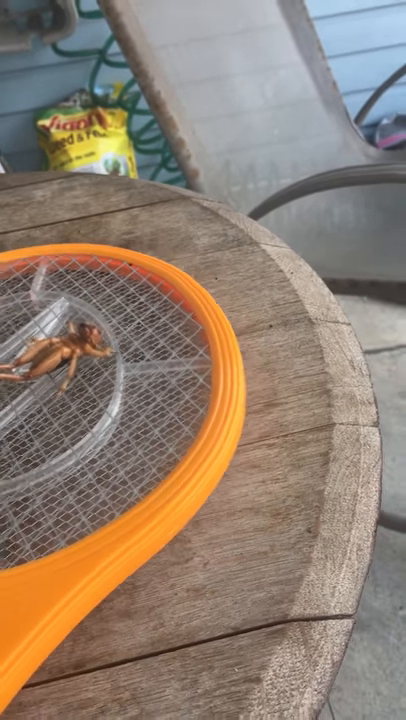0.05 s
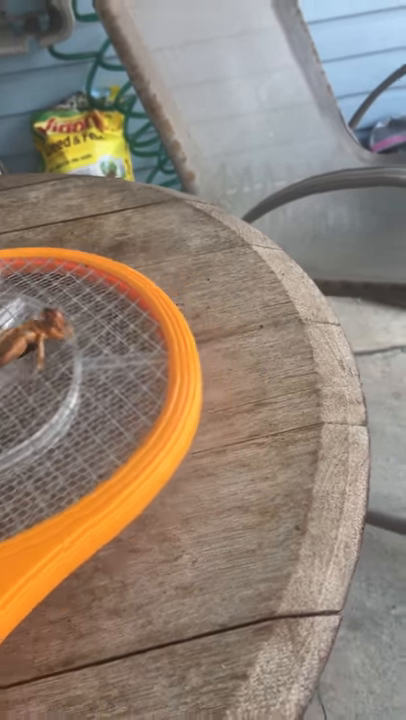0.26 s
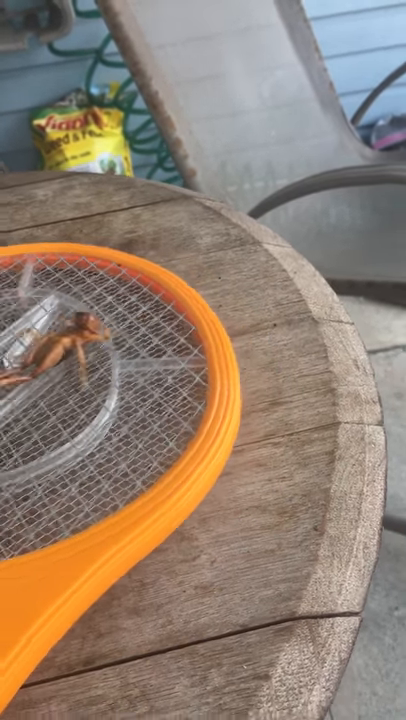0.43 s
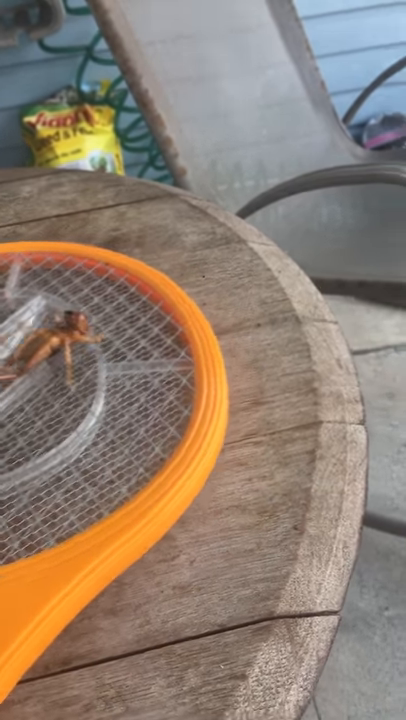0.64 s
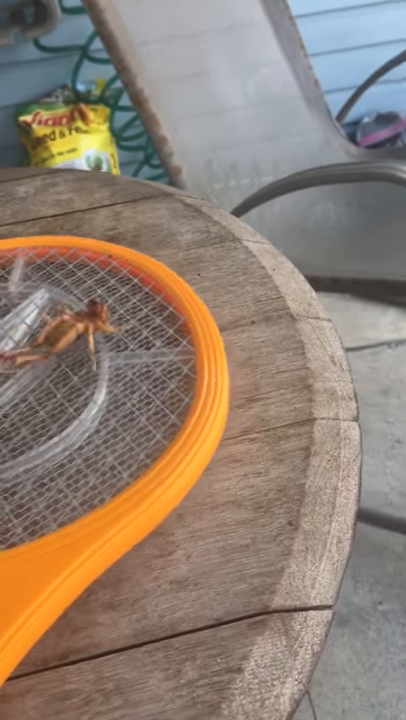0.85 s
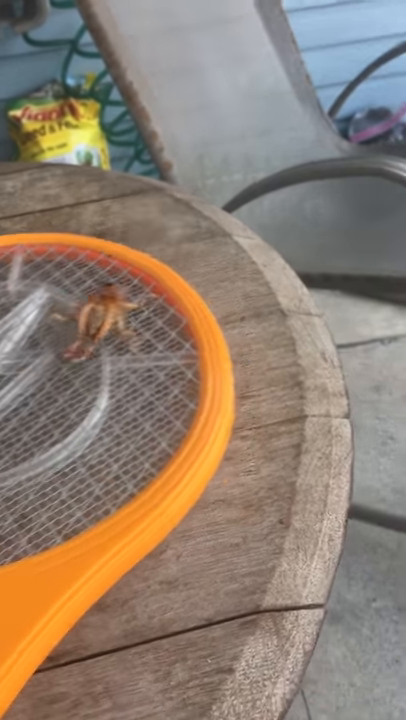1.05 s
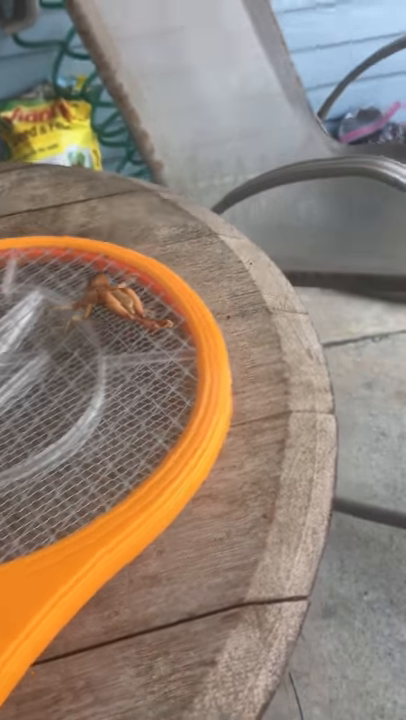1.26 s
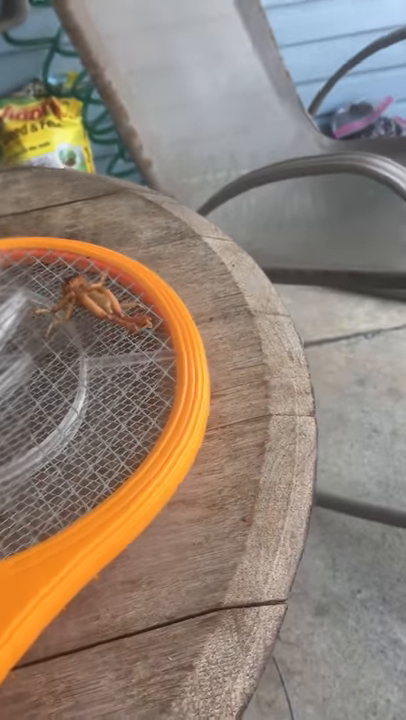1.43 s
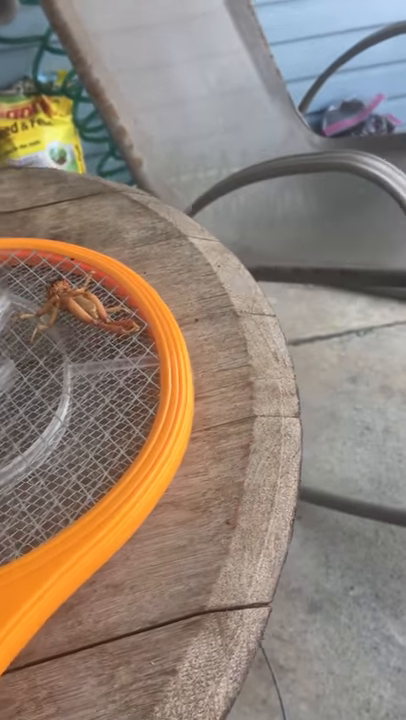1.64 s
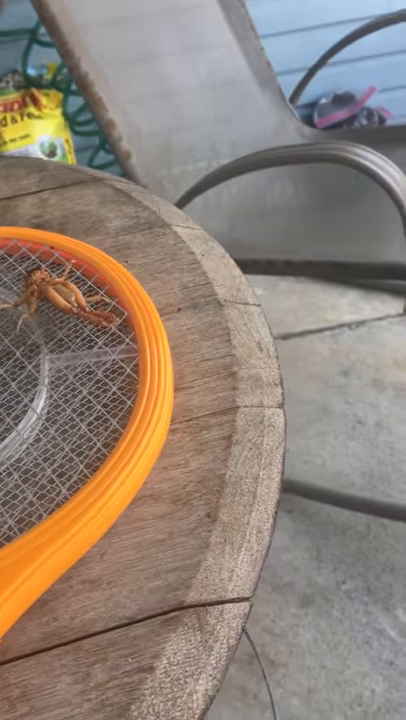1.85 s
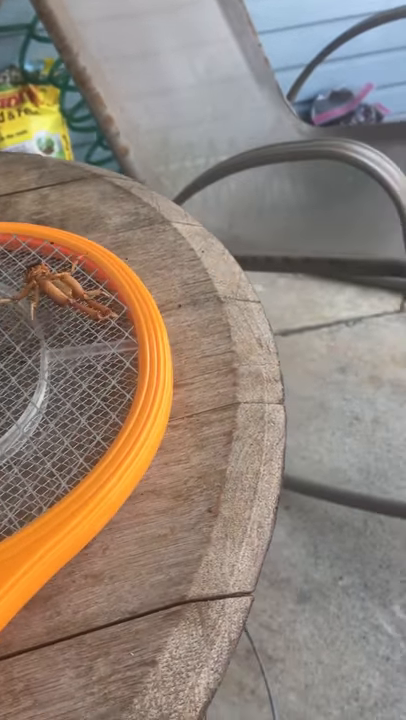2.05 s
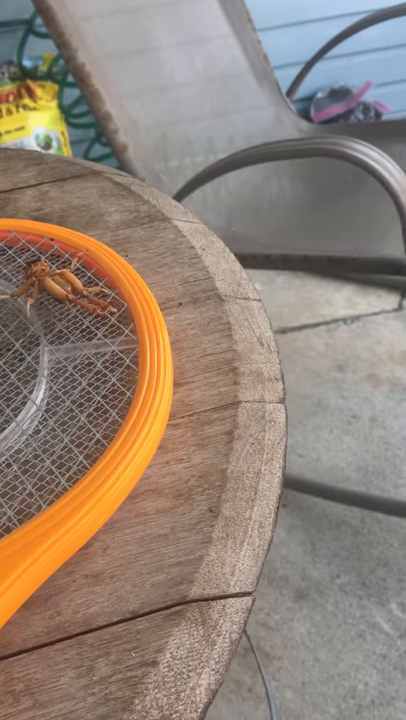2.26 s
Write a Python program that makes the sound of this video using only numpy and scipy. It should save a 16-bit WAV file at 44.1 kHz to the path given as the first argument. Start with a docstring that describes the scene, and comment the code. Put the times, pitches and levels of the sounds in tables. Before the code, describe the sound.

Two sharp electric swatter sparks amid mesh rattles and soft handling thumps, then faint crackling.

```python
"""Garden table, close up: a handheld electric swatter is jiggled with a large insect on its wire mesh.
The insect bounces and slides; the mesh rattles and rings, the plastic frame knocks.
Twice it bridges the wires: a spark snaps and echoes off table and wall.
The moving hand adds low thumps and rumble. As the racket settles, a faint electric crackle remains,
with tiny wire pings and a thin whine, over quiet outdoor air and hiss."""
import sys
import numpy as np
from scipy import signal
from scipy.fft import rfft, irfft
from scipy.io import wavfile

SR = 44100
rng = np.random.default_rng(int(sys.argv[2]) if len(sys.argv) > 2 else 0)


def unload_audio(sound):
    """Save the sound as a 16-bit wav file, at the path given as the first command line argument."""
    columns = np.transpose(np.atleast_2d(sound))
    # keep every value between -1 and 1, then stretch to whole-number steps
    steps = np.round(np.clip(columns, -1, 1) * 32767)
    wavfile.write(sys.argv[1], SR, steps.astype(np.int16))


N = 105840
T = np.arange(N) / SR

# insect landings: start_s, level_db, rattle_t60_s, treble_db
INSECT_LANDINGS = [(0.179, -43, 0.13, 2), (0.3517, -17.5, .2, 2.5), (0.407, -27.5, 0.25, 1),
                   (0.531, -26, 0.25, -1), (0.636, -21, 0.21, -3), (0.939, -29.5, 0.3, -0.5),
                   (1.035, -38.5, .2, -2.5), (1.1872, -21.5, 0.19, 2), (1.3037, -26.5, 0.22, -6.5),
                   (1.4621, -33, 0.02, -1.5)]
# insect sliding on the wires: time_s, level_db
SLIDE_CURVE = [(0.0, -68), (0.13, -52.5), (0.16, -59), (0.21, -43), (0.25, -36.5), (0.29, -55.5),
               (0.6, -60), (0.74, -39), (0.84, -57), (0.885, -50), (0.93, -55.5), (1.12, -43), (1.17, -59),
               (1.4, -46), (1.56, -69), (1.8, -71)]
# mesh rattle: freq_hz, gain_db
MESH_SPECTRUM = [(250, -18.5), (380, -5.5), (510, -8.5), (800, -15), (1100, -7.5), (1400, 5), (1750, -8),
                 (2150, -5.5), (2800, -21), (4400, -13), (5600, -22.5), (6700, -19.5), (7600, -27),
                 (9000, -19), (10600, -30), (15500, -35)]
# wire resonances: pitch_hz, gain_db, t60_s
WIRE_MODES = [(1168, -4, .14), (1310, -3, .16), (1374, 2, .22), (1455, -3, .22), (1484, -5, .18),
              (1653, -3, .11), (1918, -14, .14), (2092, -11, .17), (2206, -10, .17)]
# hollow frame resonances: pitch_hz, gain_db, t60_s
HOLLOW_FRAME_MODES = [(363.2, -10.5, 0.2), (428.8, -9.5, 0.21), (619, -18.5, 0.16)]
# frame and handle knocks: start_s, level_db, pitch_hz, t60_s
PLASTIC_KNOCKS = [(0.3536, 0.5, 1500, 0.003), (0.4421, -6, 810, 0.0031), (1.187, -8, 1100, 0.0083),
                  (1.463, -25.5, 1190, 0.0075), (1.6222, -22.5, 431, 0.026), (1.75, -30, 540, 0.041)]

# sparks: start_s, crack_db, arc_t60_s, early_db, echo_db
SPARK_SNAPS = [(0.6667, 16, .0018, -1.5, -13), (1.3251, 15, .0045, 0.5, -12.5)]
# direct crack: freq_hz, gain_db
CRACK_SPECTRUM = [(300, -12), (1500, -2), (6500, -6), (9700, 5), (12000, 1), (15500, 1)]
# spark echoes, duller: freq_hz, gain_db
ECHO_SPECTRUM = [(200, -19.5), (700, -3), (1400, 6), (2100, 3), (3000, -4.5), (4500, 1), (5500, -1),
                 (7600, -1.5), (9000, 2), (10600, -5.5), (15500, -10.5)]
# reflections off racket, table and floor: delay_s, gain_db, t60_s
EARLY_REFLECTIONS = [(0.0005, -11, 0.006), (0.003, -8, .008), (0.0098, -14.5, .016)]

# hand thumps: start_s, level_db, start_pitch_hz
HAND_THUMPS = [(0.212, -18, 344), (0.263, -15, 316), (0.327, -19, 375), (0.395, -17, 285),
               (0.555, -17, 302), (0.586, -20, 110), (0.664, -14, 367), (0.719, -28, 220),
               (0.885, -15, 140), (0.974, -21.5, 265), (0.776, -26, 224), (0.817, -33.5, 294),
               (1.003, -14, 130), (1.025, -18, 260), (1.102, -16, 110), (1.135, -19.5, 215),
               (1.198, -18, 196), (1.247, -13.5, 280), (1.306, -14, 299), (1.371, -15.5, 312),
               (1.444, -17.5, 250), (1.502, -37.5, 445), (1.596, -29.5, 420), (1.623, -22.5, 428),
               (1.696, -30, 330), (1.756, -17, 259), (1.827, -28.5, 524), (1.852, -22, 280),
               (2.112, -24.5, 126)]
# hand rumble: time_s, level_db
RUMBLE_CURVE = [(0, -35.5), (0.3, -28.5), (0.8, -34), (1.03, -25.5), (1.3, -28.5), (1.54, -31.5),
                (1.7, -31), (1.95, -39), (2.13, -36), (2.4, -41.5)]
# hand rumble: freq_hz, gain_db
RUMBLE_SPECTRUM = [(15, -43), (30, -3.5), (43, 6.5), (62, 4.5), (105, 0), (160, -19), (300, -26),
                   (1500, -78.5)]

# faint discharges: start_s, level_db, racket_ring_db
DISCHARGE_TICKS = [(1.752, -40.5, 10.5), (1.826, -31.5, 5.5), (1.897, -33, 0), (1.952, -36, 0),
                   (2.026, -38.5, -10), (2.073, -39, -1), (2.1575, -37.5, -16), (2.208, -35, 6),
                   (2.236, -33.5, 2.5), (2.279, -33, 3.5), (2.319, -35.5, 4.5), (2.394, -38, -5)]
# crackle: freq_hz, gain_db
CRACKLE_SPECTRUM = [(400, 2), (2100, 5.5), (3000, -6.5), (4300, 3), (5400, -1), (6500, -3.5), (9600, -1.5),
                    (10400, -9), (15500, -7)]
# single-wire pings: start_s, level_db
WIRE_PINGS = [(1.799, -41), (1.902, -40), (1.930, -45), (2.106, -39)]

# outdoor air: freq_hz, gain_db
AIR_SPECTRUM = [(380, 2), (500, -8.5), (680, 2.5), (900, -11), (1300, -5), (1700, -12.5), (2050, -9.5),
                (3000, -42)]
# hiss: time_s, level_db
HISS_CURVE = [(0, -64.5), (1.48, -63.5), (1.745, -64), (1.775, -71.5), (2.4, -72)]
# hiss: freq_hz, gain_db
HISS_SPECTRUM = [(500, -57), (2000, -9), (5000, -7), (9700, -12), (10500, -15)]


def from_db(db):
    """Decibels to gain."""
    return 10 ** (np.asarray(db) / 20)


def level(curve):
    """Gain along (time_s, level_db) points."""
    return from_db(np.interp(T, *np.transpose(curve)))


def decay(start_s, t60_s):
    """Step to 1, then exponential decay."""
    return (T >= start_s) * from_db(-60 * np.clip((T - start_s) / t60_s, 0, 10))


def coloured(x, spectrum):
    """Minimum-phase filter through (freq_hz, gain_db) points; unit power gain."""
    size = 8192
    hz, db = np.transpose(spectrum)
    bins_hz = np.fft.rfftfreq(size, 1 / SR)
    gain = from_db(np.interp(np.log(bins_hz + 1), np.log(hz), db))
    cepstrum = irfft(np.log(gain))
    cepstrum[1:size // 2] *= 2
    cepstrum[size // 2 + 1:] = 0
    response = irfft(np.exp(rfft(cepstrum)))
    return signal.fftconvolve(x, response / np.linalg.norm(response))[:len(x)]


def noise(spectrum):
    """Steady coloured noise, rms about 1."""
    return coloured(rng.standard_normal(N + SR), spectrum)[SR:]


def split(x, hz):
    """Low and high bands."""
    low = signal.sosfiltfilt(signal.butter(2, hz, fs=SR, output="sos"), x)
    return low, x - low


def ring(x, hz, t60_s):
    """Two-pole resonator; unit power gain."""
    radius, angle = from_db(-60 / (t60_s * SR)), 2 * np.pi * hz / SR
    gain = np.sin(angle) * np.sqrt(2 * (1 - radius ** 2))
    return signal.lfilter([0, gain], [1, -2 * radius * np.cos(angle), radius ** 2], x + 1e-18)


def clicks(rows):
    """One impulse per (start_s, level_db)."""
    out = np.zeros(N)
    for start_s, db in rows:
        out[min(int(start_s * SR), N - 1)] += from_db(db)
    return out


def grains(rate_per_s, spread_db):
    """Random impulses of uneven size and sign."""
    hits = rng.random(N) < rate_per_s / SR
    return hits * from_db(spread_db * rng.standard_normal(N)) * rng.choice([-1, 1], N)


def discharges(rows, sizzle_db=-20, t60_s=0.026):
    """Click plus brief sizzle per (start_s, level_db)."""
    sizzle = sum(from_db(db + sizzle_db) * decay(start_s, t60_s) for start_s, db in rows)
    return clicks(rows) + sizzle * rng.standard_normal(N)


def mesh_rattle(rattle_db=-1, ring_db=-19.5, touch_db=-8.5, touch_t60_s=0.011):
    """Tiny insect contacts drive the mesh: sliding, plus a brief touch and dying run per landing."""
    contacts = grains(rate_per_s=5000, spread_db=2.5)
    low, high = split(contacts / contacts.std(), hz=2780)
    low_power = high_power = level(SLIDE_CURVE) ** 2
    for start_s, db, t60_s, treble_db in INSECT_LANDINGS:
        touch = from_db(touch_db) * decay(start_s, touch_t60_s)
        landing = from_db(db) * (decay(start_s, t60_s) + touch)
        low_power = low_power + landing ** 2
        high_power = high_power + (from_db(treble_db) * landing) ** 2
    drive = low * np.sqrt(low_power) + high * np.sqrt(high_power)
    ringing = sum(from_db(db) * ring(drive, hz, t60_s) for hz, db, t60_s in WIRE_MODES)
    return from_db(rattle_db) * coloured(drive, MESH_SPECTRUM) + from_db(ring_db) * ringing


def landing_rings(wire_db=-7.5, spread_db=1, rise_s=0.004, max_t60_ratio=1.5):
    """Each landing strikes wire and frame modes; a short, dead landing damps them."""
    out = 0
    for start_s, db, rattle_t60_s, _ in INSECT_LANDINGS:
        age_s = np.maximum(T - start_s, 0)
        rise = 1 - np.exp(-age_s / rise_s)
        for modes, body_db in ((WIRE_MODES, wire_db), (HOLLOW_FRAME_MODES, 0)):
            for hz, mode_db, t60_s in modes:
                gain = from_db(db + body_db + mode_db + spread_db * rng.standard_normal())
                fade = decay(start_s, min(t60_s, max_t60_ratio * rattle_t60_s))
                out += gain * rise * fade * np.sin(2 * np.pi * (hz * age_s + rng.random()))
    return out


def frame_knocks(rise_cycles=0.73):
    """Plastic frame and handle: one heavily damped mode per knock."""
    out = 0
    for start_s, db, hz, t60_s in PLASTIC_KNOCKS:
        cycles = hz * np.maximum(T - start_s, 0)
        rise = 1 - np.exp(-cycles / rise_cycles)
        out += from_db(db) * rise * decay(start_s, t60_s) * np.sin(2 * np.pi * cycles)
    return out


def sparks(arc_db=-16, yard_low_db=-21, yard_high_db=-5.5):
    """Insect bridges the wires: sharp pulse, brief arc, early reflections, short yard echo."""
    scatter = rng.standard_normal(N)
    low, high = split(rng.standard_normal(N), hz=1000)
    arc_envelope = echoes = 0
    for start_s, crack_db, arc_t60_s, early_db, echo_db in SPARK_SNAPS:
        arc_envelope += from_db(crack_db + arc_db) * decay(start_s, arc_t60_s)
        early = scatter * sum(from_db(db) * decay(start_s + delay_s, t60_s)
                              for delay_s, db, t60_s in EARLY_REFLECTIONS)
        yard_low = from_db(yard_low_db) * low * decay(start_s, t60_s=0.19)
        yard_high = from_db(yard_high_db) * high * decay(start_s, t60_s=0.15)
        echoes += from_db(early_db) * early + from_db(echo_db) * (yard_low + yard_high)
    pulses = clicks(row[:2] for row in SPARK_SNAPS)
    arcs = arc_envelope * rng.standard_normal(N)
    return coloured(pulses + arcs, CRACK_SPECTRUM) + coloured(echoes, ECHO_SPECTRUM)


def handling(rest_hz=50.5, fall_s=0.0059, peak_s=0.0098, sharpness=1.46):
    """Moving hand: low rumble and soft thumps that swell and drop in pitch."""
    out = level(RUMBLE_CURVE) * noise(RUMBLE_SPECTRUM)
    for start_s, db, start_hz in HAND_THUMPS:
        age_s = np.maximum(T - start_s, 0)
        cycles = rest_hz * age_s + (start_hz - rest_hz) * fall_s * (1 - np.exp(-age_s / fall_s))
        swell = (age_s / peak_s * np.exp(1 - age_s / peak_s)) ** sharpness
        out += from_db(db) * swell * np.sin(2 * np.pi * (cycles + rng.random()))
    return out


def crackle(sizzle_db=-44, sizzle_start_s=1.87):
    """Tiny discharges through the resting insect, some ringing the racket, over a fine sizzle."""
    sizzle = from_db(sizzle_db) * grains(rate_per_s=120, spread_db=3) * (T > sizzle_start_s)
    ticks = discharges([row[:2] for row in DISCHARGE_TICKS])
    racket_drive = discharges([(start_s, db + ring_db) for start_s, db, ring_db in DISCHARGE_TICKS])
    return coloured(ticks + sizzle, CRACKLE_SPECTRUM) + ring(racket_drive, hz=1330, t60_s=0.0062)


def wire_pings():
    """Single wires ping: discharges into one high mode."""
    return ring(discharges(WIRE_PINGS), hz=5450, t60_s=0.0066)


def whine(level_db=-62.5, centre_s=2.034, width_s=0.11):
    """Faint wavering tone: one swell of narrow-band noise."""
    swell = np.exp(-((T - centre_s) / width_s) ** 2)
    return from_db(level_db) * swell * ring(rng.standard_normal(N), hz=1250, t60_s=0.024)


def background(air_db=-61.5):
    """Steady outdoor air; thin hiss that drops near the end."""
    return from_db(air_db) * noise(AIR_SPECTRUM) + level(HISS_CURVE) * noise(HISS_SPECTRUM)


def scene():
    """All sources at one close microphone."""
    racket = mesh_rattle() + landing_rings() + frame_knocks()
    electric = sparks() + crackle() + wire_pings() + whine()
    return (racket + electric + handling() + background())[None]


def record(dry, clip_limit=0.74, cutoff_hz=15900):
    """Microphone clips the spark peaks; steep low-pass follows."""
    lowpass = signal.ellip(10, 0.1, 80, cutoff_hz, fs=SR, output="sos")
    return signal.sosfilt(lowpass, np.clip(dry, -clip_limit, clip_limit))


dry = scene()
out = record(dry)
unload_audio(out)
```